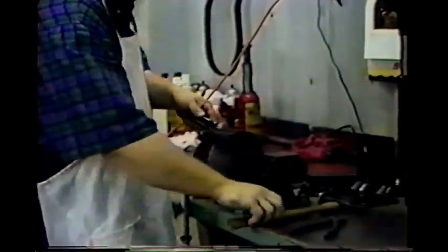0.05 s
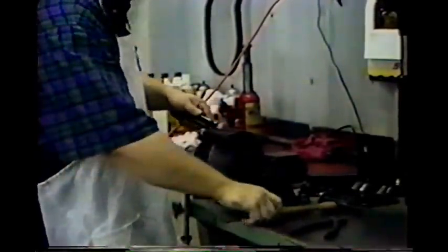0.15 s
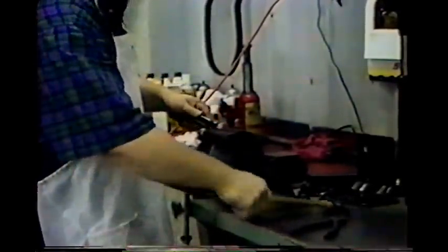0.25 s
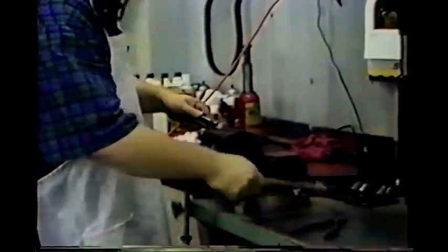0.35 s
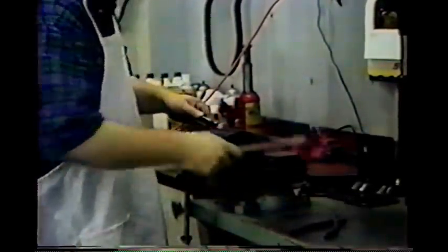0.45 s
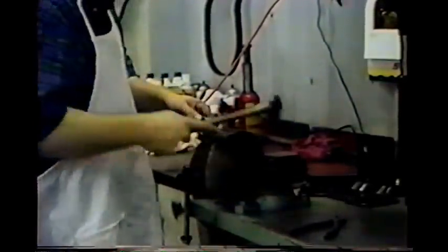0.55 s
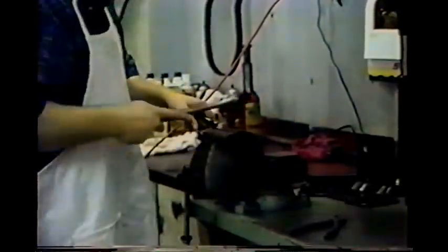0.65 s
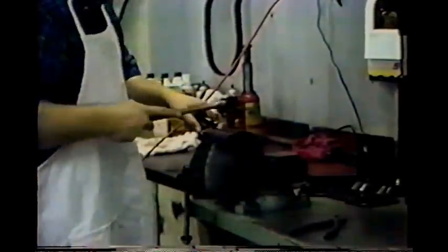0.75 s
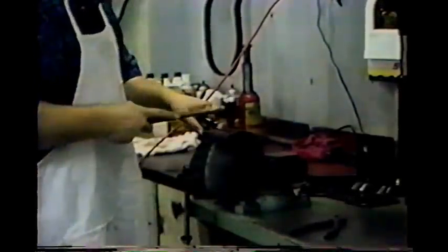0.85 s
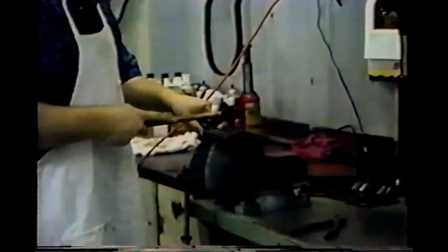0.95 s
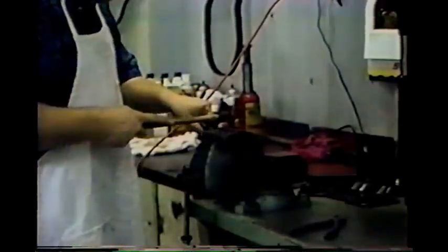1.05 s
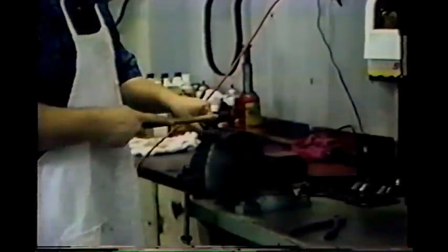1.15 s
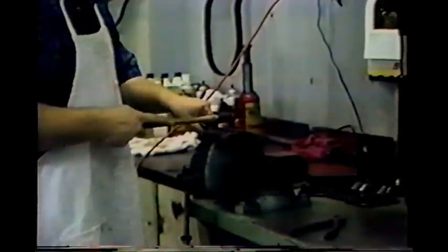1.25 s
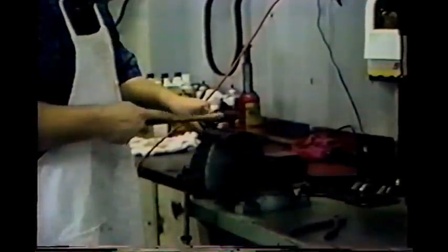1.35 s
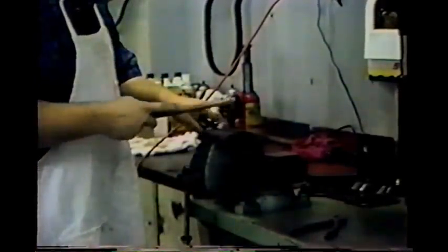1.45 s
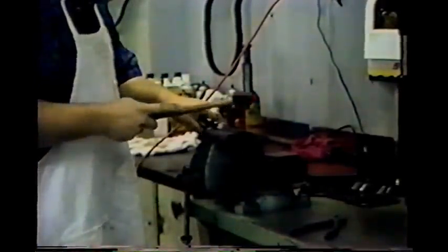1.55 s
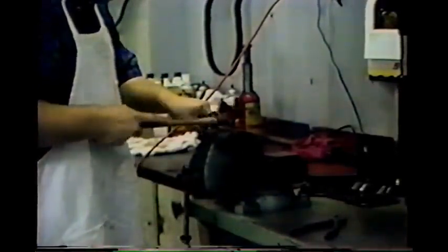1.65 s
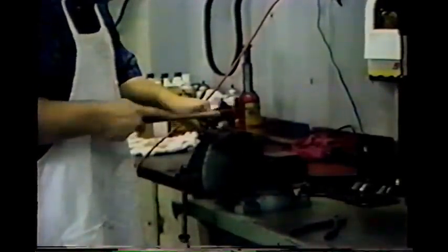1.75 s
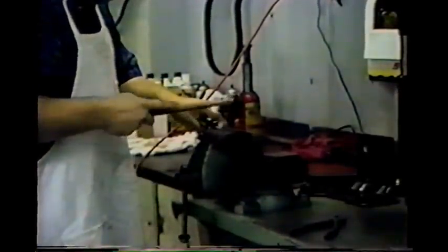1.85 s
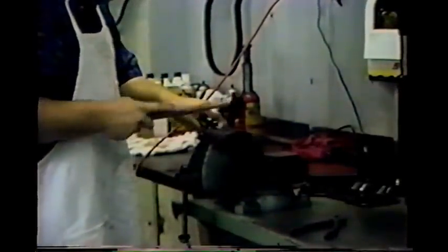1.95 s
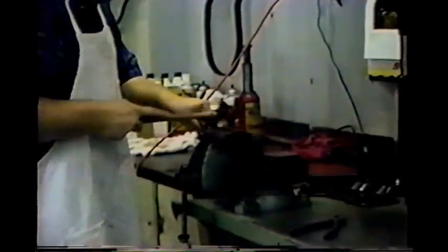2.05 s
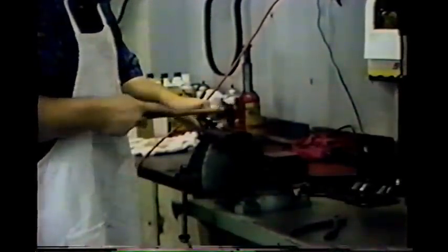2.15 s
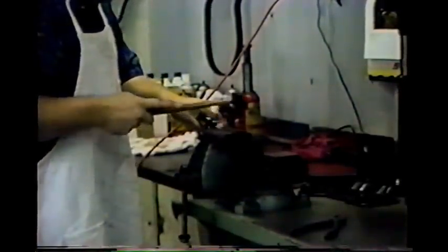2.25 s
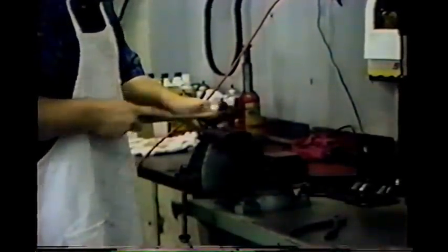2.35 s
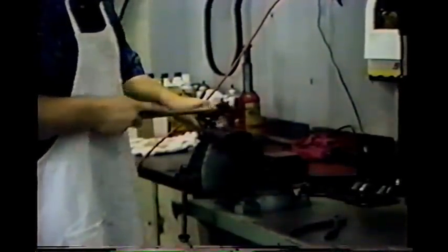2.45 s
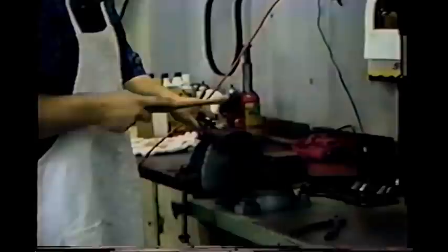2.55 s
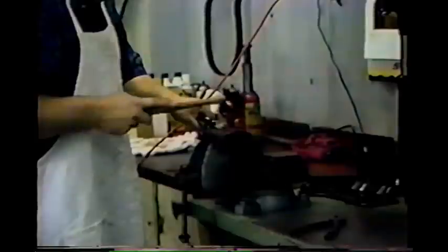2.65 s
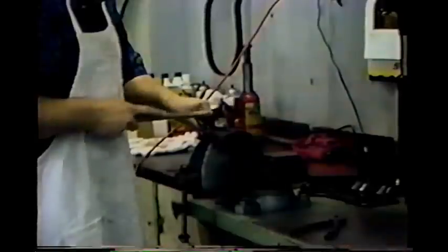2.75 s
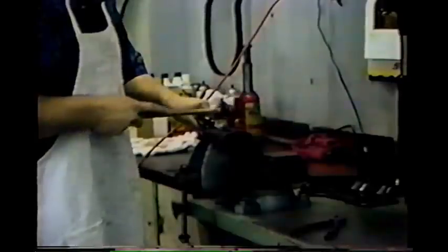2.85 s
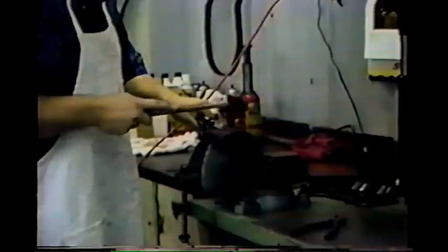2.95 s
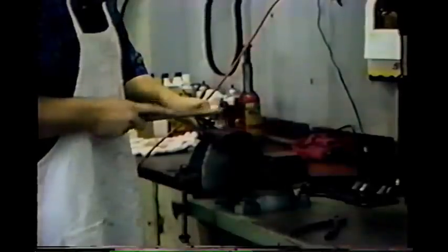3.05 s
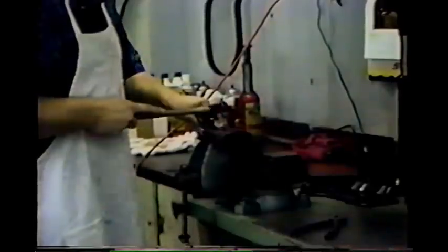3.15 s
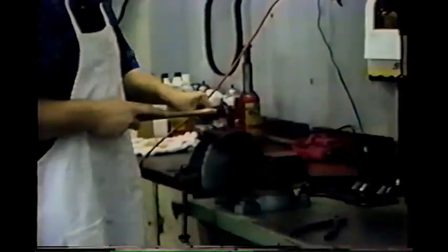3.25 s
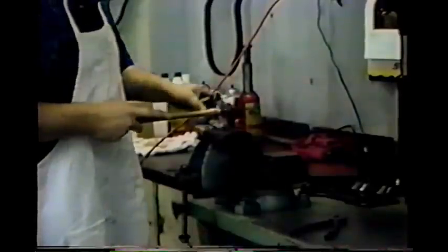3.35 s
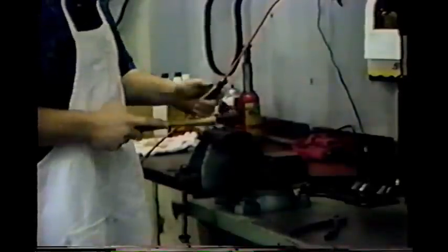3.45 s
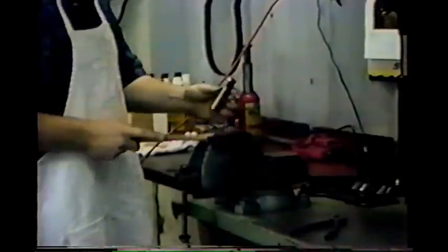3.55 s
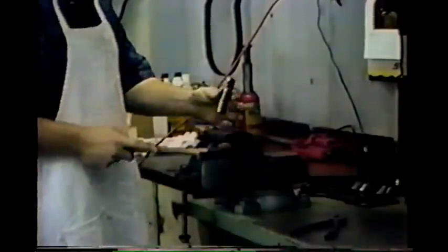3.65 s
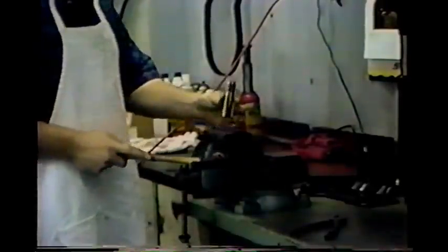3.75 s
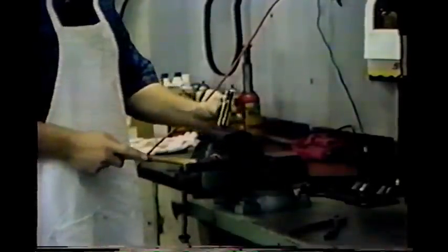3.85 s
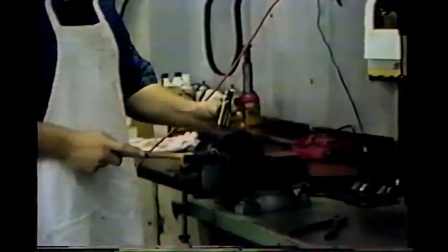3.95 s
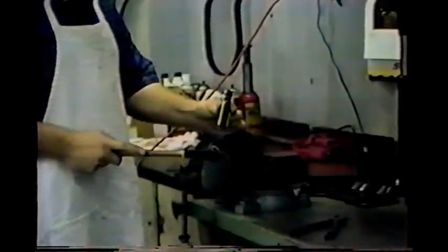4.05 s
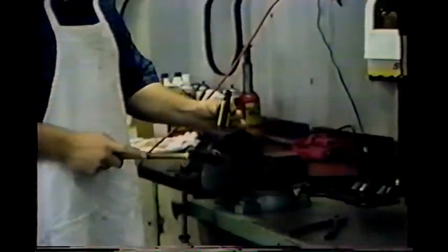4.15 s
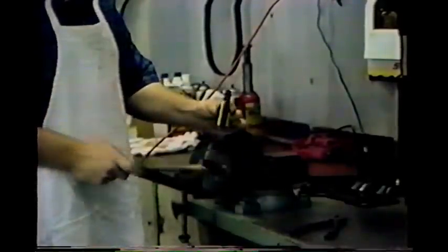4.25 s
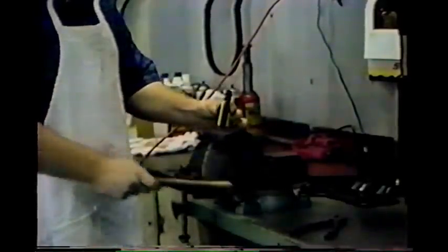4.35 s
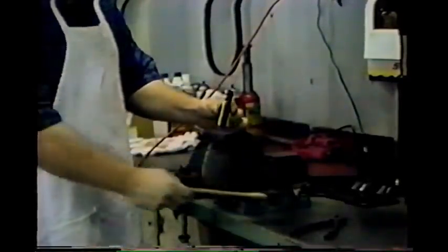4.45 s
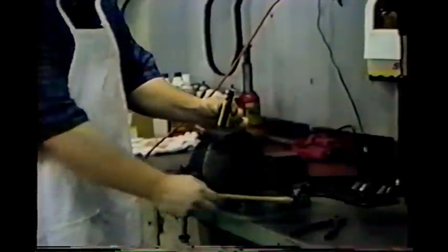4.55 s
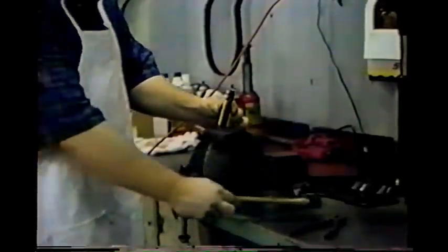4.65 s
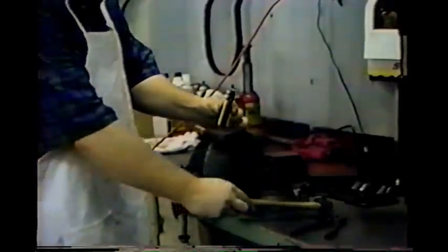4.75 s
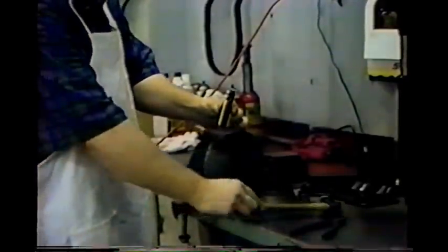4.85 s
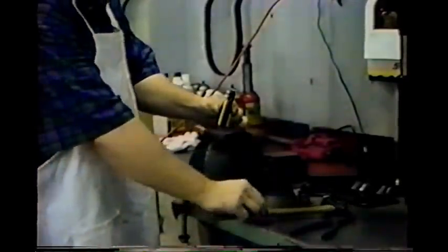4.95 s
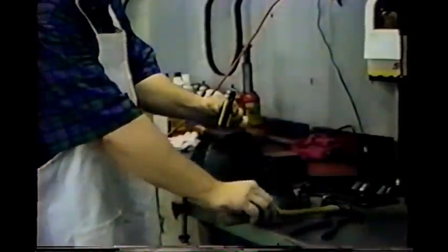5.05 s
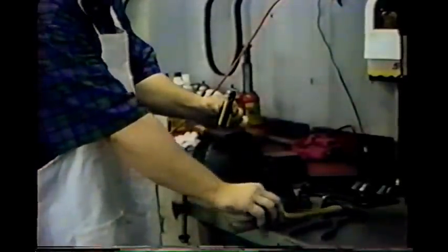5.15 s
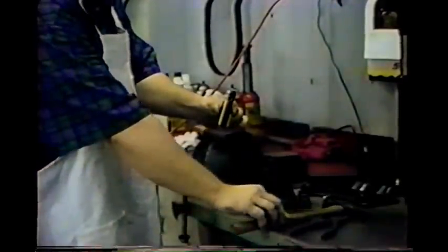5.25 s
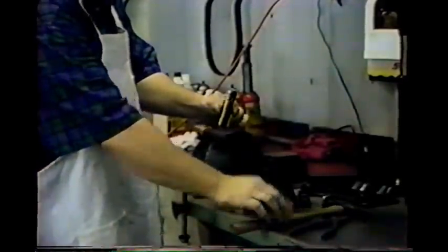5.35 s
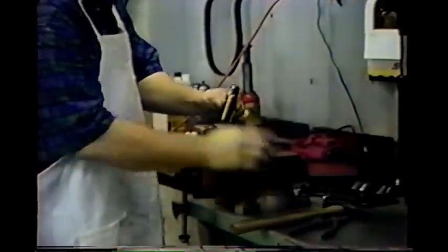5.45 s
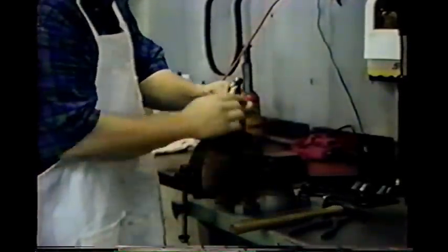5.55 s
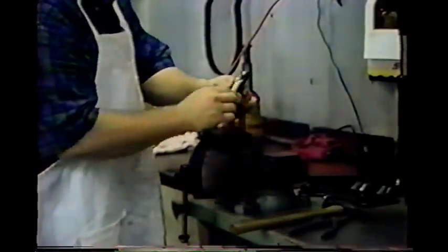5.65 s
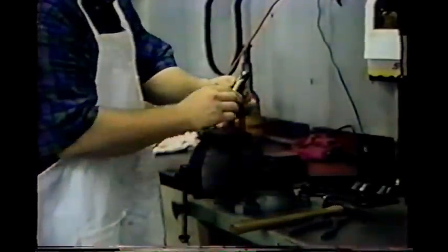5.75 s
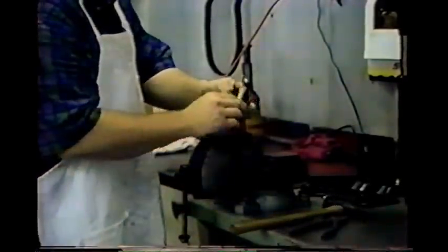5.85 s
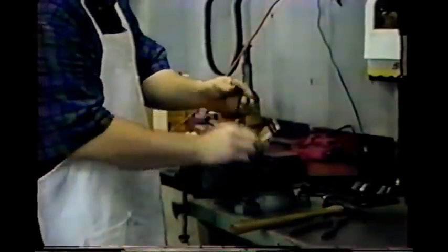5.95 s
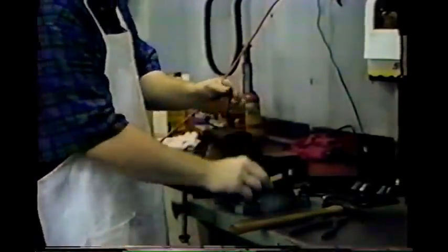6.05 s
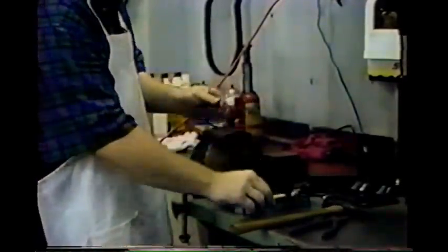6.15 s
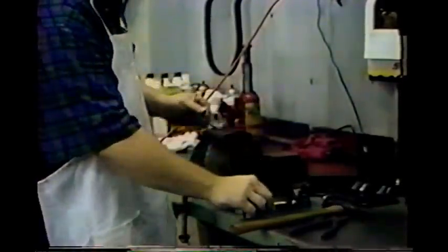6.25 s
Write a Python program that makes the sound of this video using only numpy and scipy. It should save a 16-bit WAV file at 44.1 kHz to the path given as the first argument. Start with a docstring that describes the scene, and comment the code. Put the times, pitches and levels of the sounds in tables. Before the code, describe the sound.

Short scrape, faint tap, five sharp hammer blows on steel clamped in a vise, a tiny clink, then a hammer rattling onto a bench.

```python
"""Hammer blows at a workbench

A hammer is dragged off a workbench, taps a screwdriver clamped in a vise, then strikes it five times.
Blows are shaped noise plus fading sines: the bench thuds, the steel rings and the workshop echoes.
A small part clinks, then the hammer clatters back onto the bench, over ventilation rumble, hiss and hum.
A tape camera hears it: loud sounds push its gain down, and from then on the gain only sinks further."""
import sys
import numpy as np
from scipy import signal
from scipy.fft import rfft, irfft
from scipy.io import wavfile
from scipy.ndimage import uniform_filter1d, minimum_filter1d

SR = 44100
rng = np.random.default_rng(int(sys.argv[2]) if len(sys.argv) > 2 else 0)


def unload_wav(signal):
    """Save mono or channel-first audio to the path in sys.argv[1] as 16-bit WAV at rate SR, clipped to [-1, 1]."""
    wavfile.write(
        sys.argv[1],
        SR,
        np.round(np.clip(np.atleast_2d(signal).T, -1, 1) * 32767).astype(np.int16),
    )


N = 278419  # length of the scene in samples
TAIL = 65536  # length of one struck sound or echo in samples


def amp(db):
    """Turns decibels into a gain."""
    return 10 ** (np.asarray(db) / 20)


def unit(x):
    """Scales a sound to an rms of 1."""
    return x / np.sqrt(np.mean(x ** 2) + 1e-20)


def read(points, hz):
    """Joins (frequency, value) points by straight lines on a log-frequency axis."""
    point_hz, value = np.transpose(points)
    return np.interp(np.log(hz + 1), np.log(point_hz + 1), value)


def bins(size):
    """Lists the frequencies in the spectrum of this many samples."""
    return np.fft.rfftfreq(size, 1 / SR)


def bell(hz, centre_hz, width_hz):
    """Draws the power curve of one resonance, with its top at 1."""
    return 1 / (1 + (2 * (hz - centre_hz) / width_hz) ** 2)


def noise(gain, size):
    """Makes random noise with the given gain at each frequency."""
    return irfft(rfft(rng.standard_normal(size)) * gain, size)


def bands(x, centres):
    """Splits a sound into overlapping frequency bands that add up to it again."""
    spectrum, hz = rfft(x), bins(len(x))
    return [irfft(spectrum * read(np.c_[centres, pick], hz), len(x)) for pick in np.eye(len(centres))]


def tone(hz, waver_hz, pace_hz, size):
    """Makes a sine of rms 1 whose pitch wavers at random."""
    drift = unit(noise(bell(bins(size), 0, pace_hz), size))
    cycles = np.cumsum(hz + waver_hz * drift) / SR
    return np.sqrt(2) * np.sin(2 * np.pi * (cycles + rng.random()))


def add(mix, start_s, sound):
    """Mixes a sound in at its start time."""
    part = mix[max(round(start_s * SR), 0):][:len(sound)]
    part += sound[:len(part)]


def hammering():
    """Each blow shakes vise and bench, with its own share of steel clank and steel ring."""
    # hammer on the screwdriver: (time [s], force [dB], bench thud [dB], treble [dB], length factor,
    # contact resonance [Hz], its width [Hz], its lift [dB], steel clank [dB], steel ring [dB])
    blows = [(0.9936, -43, 1, -1.5, 0.91, 990, 750, 15, -38.5, -64.5),
             (1.625, -20.5, -1.5, -4, 1.07, 1600, 900, 2, -14.5, -28),
             (1.9945, -24, -7.5, -11.5, 1.1, 1440, 400, 3, -25, -44),
             (2.3536, -26, 1.5, -3, 1.02, 920, 300, 6, -31, -43.5),
             (2.713, -25.5, 1, -0.5, 1.01, 1090, 400, 5, -38, -44),
             (3.0716, -27, -6.5, 0, 0.73, 1320, 900, 5, -37, -46)]
    # colour of vise and bench together: (frequency [Hz], relative level [dB])
    vise_colour = [(40, -5.5), (110, -6), (170, -1.5), (330, -0.5), (800, -2), (1500, -0.5), (2300, -0.5),
                   (3000, 1.5), (4100, -1), (5000, 0), (6200, -5.5), (7800, -10), (10000, -20.5),
                   (15500, -39.5)]
    # strongest low modes of the vise: (frequency [Hz], level [dB], time to fade by 60 dB [s])
    vise_modes = [(205, -23, 0.27), (338.7, -17, 0.29), (483, -16, 0.24), (718, -17.5, .22),
                  (881, -14.5, .22), (1140, -13, 0.33), (1332, -14.5, 0.21)]
    # close modes of the clamped steel: (frequency [Hz], relative level [dB], time to fade by 60 dB [s])
    steel_modes = [(3730, -11.5, 1.02), (4129, -8, .5), (4630, -6, 0.87), (4680, -13, 0.84),
                   (4880, -6.5, 1.6), (4847, -2, 0.85), (4955, -4.5, 0.94), (5030, -11.5, .9),
                   (4970, -1, 0.59), (5180, -10.5, 0.57)]
    steel_size = np.linalg.norm([amp(mode[1]) for mode in steel_modes])
    out = np.zeros(N)
    for start_s, force_db, *contact, clank_db, ring_db in blows:
        add(out, start_s, amp(force_db) * strike(vise_colour, vise_modes, *contact))
        add(out, start_s, amp(clank_db) * clank(centre_hz=4804, width_hz=650, t60=0.16))
        steel = ring(steel_modes, waver_hz=50, pace_hz=130)
        add(out, start_s, amp(ring_db) * steel / steel_size)
    return out


def strike(colour, modes, thud_db, treble_db, length, contact_hz, width_hz, lift_db):
    """A heavy body is hit: its treble cracks at once, its bass swells later, and a few modes ring clear."""
    # how the struck body swells and dies: (frequency [Hz], rise time constant [s], 60 dB fade time [s])
    thud_bands = [(80, .03, .4), (200, .028, .27), (450, 0.012, 0.27), (984, 0.0045, .26),
                  (2200, 0.002, 0.263), (4500, 0.00037, 0.25), (8000, 0.00035, .18), (14000, .0002, .12)]
    hz, t = bins(TAIL), np.arange(TAIL) / SR
    colour_db = read(colour, hz)
    colour_db += thud_db / (1 + (hz / 520) ** 2)  # acts mainly below 520 Hz
    colour_db += treble_db * hz ** 2 / (hz ** 2 + 3600 ** 2)  # acts mainly above 3600 Hz
    colour_db += lift_db * bell(hz, contact_hz, width_hz)  # the spot that is hit favours one region
    body = np.zeros(TAIL)
    parts = bands(noise(amp(colour_db), TAIL), [row[0] for row in thud_bands])
    for part, (_, rise_s, t60) in zip(parts, thud_bands):
        swell = 1 - np.exp(-t / rise_s)
        body += part * unit(swell * amp(-60 * t / (t60 * length)))
    body *= 1 + 0.47 * np.exp(-t / 0.0035)  # a short extra crack at the start
    clear = ring(modes, waver_hz=5.8, pace_hz=60) * (1 - np.exp(-t / 0.0047))
    first_50_ms = body[:SR // 20]
    return body / first_50_ms.std() + amp(thud_db / 2) * clear


def ring(modes, waver_hz, pace_hz):
    """Struck modes are fading sines; a quick waver smears close ones into one rough ring."""
    t = np.arange(TAIL) / SR
    return sum(amp(db - 60 * t / t60) * tone(hz, waver_hz, pace_hz, TAIL) for hz, db, t60 in modes)


def clank(centre_hz, width_hz, t60):
    """Steel meeting steel gives a short bright burst: noise around one pitch region, fading fast."""
    t = np.arange(TAIL) / SR
    return unit(noise(bell(bins(TAIL), centre_hz, width_hz), TAIL)) * amp(-60 * t / t60)


def clatter():
    """A loose steel part clinks as it is stood on the vise; then the hammer lands and settles on the bench."""
    # the hammer landing and settling: (time [s], force [dB], bench thud [dB], treble [dB], length factor,
    # contact resonance [Hz], its width [Hz], its lift [dB], head clank [dB])
    knocks = [(4.7357, -25, -2.5, -7, 0.74, 1690, 600, 1.5, -40),
              (4.7836, -31, 4, 4.5, 1, 4400, 1400, 4, -21),
              (4.866, -35.5, 2.5, -1.5, 0.77, 6460, 2000, 3, -34),
              (4.941, -24, -2.5, 0.5, 0.83, 2470, 696, 3.5, -45),
              (5.1665, -34, 1.5, -8, 0.62, 2100, 600, 5.5, -43)]
    # colour of the bare bench top: (frequency [Hz], relative level [dB])
    bench_colour = [(40, -2.5), (130, -8.5), (260, -6.5), (400, -3.5), (1200, 0.5), (2500, -3.5),
                    (4500, -3), (6500, -7), (9000, -21), (15500, -43)]
    # strongest low modes of the bench top: (frequency [Hz], level [dB], time to fade by 60 dB [s])
    bench_modes = [(336.6, -19.5, 0.27), (378, -15, 0.29), (569.6, -8.5, 0.21), (710, -16, 0.17),
                   (1076, -10.5, 0.29), (1333, -17, .2), (1770, -13, 0.18)]
    # modes of the loose steel part: (frequency [Hz], relative level [dB], time to fade by 60 dB [s])
    clink_modes = [(1400, -2, 0.14), (1728, 2, 0.24), (2250, -7, .15), (2660, -9, .15), (3128, -16, .18)]
    clink_s = 3.834
    out = np.zeros(N)
    touch = strike(bench_colour, bench_modes, thud_db=-12, treble_db=-10, length=0.61,
                   contact_hz=1650, width_hz=1100, lift_db=14.5)
    add(out, clink_s, amp(-50.5) * touch)
    add(out, clink_s, amp(-47.5) * ring(clink_modes, waver_hz=12, pace_hz=100))
    for start_s, force_db, *contact, clank_db in knocks:
        add(out, start_s, amp(force_db) * strike(bench_colour, bench_modes, *contact))
        add(out, start_s, amp(clank_db) * clank(centre_hz=4420, width_hz=1160, t60=0.13))
    return out


def drag():
    """Many tiny slips rattle the bench top while the hammer head squeals thinly at the start of each pull."""
    # pulls that slide the head off the bench: (start [s], length [s], final pressure [dB],
    # squeal [dB], squeal length [s])
    pulls = [(-.03, .128, -46.5, -51, .031), (.127, .097, -40.8, -50, .077)]
    # colour of the scrape: (frequency [Hz], relative level [dB])
    scrape_colour = [(59, -26), (100, -8), (293, -6), (592, 1), (1270, -1), (1350, 0.5), (2970, -9),
                     (4580, -9), (5520, -12.5), (6510, -19.5), (14000, -45)]
    # resonances of the squeal: (frequency [Hz], width [Hz], relative level [dB])
    squeal_peaks = [(5490, 420, 0), (7450, 280, -12.5)]
    slips_per_s, slip_t60 = 1100, 0.042  # average rate; seconds for one slip to fade by 60 dB
    swell_db_per_s = 50  # each pull presses harder towards its end
    t, hz = np.arange(N) / SR, bins(N)
    slips = rng.exponential(1, N) * (rng.random(N) < slips_per_s / SR)
    slip_power = amp(-60 * t[:TAIL] / slip_t60) ** 2
    shaking = np.sqrt(abs(signal.fftconvolve(slips, slip_power)[:N]))
    scrape = unit(shaking * noise(amp(read(scrape_colour, hz)), N))
    squeal_gain = sum(amp(db) * bell(hz, centre_hz, width_hz) for centre_hz, width_hz, db in squeal_peaks)
    squeal = unit(noise(squeal_gain, N))
    out = np.zeros(N)
    for start_s, length_s, pressure_db, squeal_db, squeal_s in pulls:
        remaining_s = np.clip(start_s + length_s - t, 0, length_s)
        pressure = amp(pressure_db - swell_db_per_s * remaining_s)
        out += scrape * pressure * stroke(t - start_s, length_s, release_t60=0.2)
        # the squeal breaks off once the head runs free
        out += squeal * amp(squeal_db) * stroke(t - start_s, squeal_s, release_t60=0.09)
    return out


def stroke(t, length_s, release_t60):
    """A rub that starts at t = 0 grips within 30 ms, holds and then lets go."""
    grip = np.clip(t / 0.03, 0, 1)
    return grip * amp(-60 * np.maximum(t - length_s, 0) / release_t60)


def workshop(x):
    """The room adds a diffuse echo: noise that builds up quickly and dies at its own pace in each band."""
    # echo of the workshop: (frequency [Hz], level [dB], time to fade by 60 dB [s])
    room = [(100, -10.5, .7), (350, -10.5, 1.02), (800, -17, 0.55), (1580, -12.5, 0.95),
            (2970, -10.5, 1.38), (4905, -14, 1.61), (8000, -9, 1.1), (14000, -2.5, 0.31)]
    t = np.arange(TAIL) / SR
    build_up = 1 - np.exp(-t / 0.0099)
    parts = bands(rng.standard_normal(TAIL) / np.sqrt(TAIL), [row[0] for row in room])
    echo = np.zeros(TAIL)
    for part, (_, db, t60) in zip(parts, room):
        echo += part * amp(db) * unit(build_up * amp(-60 * t / t60))
    return x + signal.fftconvolve(x, echo)[:N]


def ports(x):
    """Reflections from the sides reach the two microphone ports a little differently."""
    # what differs between the ports: (frequency [Hz], side level against the middle [dB])
    width = [(30, -7), (125, -9), (250, -13), (500, -18), (1000, -22), (4000, -22), (8000, -19),
             (15000, -21)]
    fade = unit(amp(-60 * np.arange(TAIL) / SR / 0.19))  # fades by 60 dB in 0.19 s
    scatter = noise(amp(read(width, bins(TAIL))), TAIL) * fade / np.sqrt(TAIL)
    side = signal.fftconvolve(x, scatter)[:N]
    return np.array([x + side, x - side])


def steady(colour):
    """Air flow and hiss are steady noise with a given level in each hertz of bandwidth."""
    return noise(amp(read(colour, bins(N))) * np.sqrt(SR / 2), N)


def scene():
    """The work at the bench and its echo sound over the ventilation rumble, heard at two ports."""
    # colour of the ventilation: (frequency [Hz], relative level [dB])
    air_colour = [(12, -43.5), (20, -13.5), (43, -10.5), (70, 2.5), (135, -2), (169, -1.5), (238, -4),
                  (450, -13), (682, -16.5), (938, -16.5), (2210, -20.5), (2380, -23.5), (4850, -30.5),
                  (7000, -33), (9100, -67), (15400, -120)]
    work = workshop(hammering() + clatter() + drag())
    return ports(work + amp(-57.5) * unit(steady(air_colour)))


def gain_control(x):
    """Loudness above a limit turns the gain down; it never recovers and sinks slowly after each new low."""
    limit_db, attack_s = -25.5, 0.012
    sink_db_per_s = 0.28
    keep = np.exp(-1 / (attack_s * SR))
    power = signal.lfilter([1 - keep], [1, -keep], (x ** 2).mean(0))
    power_db = 10 * np.log10(power + 1e-12)
    sink_db = sink_db_per_s * np.arange(N) / SR
    held_peak_db = np.maximum.accumulate(power_db - sink_db) + sink_db
    return x * amp(-np.maximum(held_peak_db - limit_db, 0))


def limiter(x):
    """Peaks above a ceiling are flattened by a fast gain that follows the louder channel."""
    peak = -minimum_filter1d(-abs(x).max(0), size=120)
    crest = uniform_filter1d(peak, size=120)
    return x / np.maximum(crest / amp(-20.5), 1)  # ceiling -20.5 dB


def record(dry):
    """The camera controls the gain, limits peaks, adds hiss and hum, tilts the stereo and cuts the top."""
    # tape hiss: (frequency [Hz], level in each hertz [dB])
    hiss_colour = [(20, -104), (70, -102), (200, -107), (500, -112), (1500, -117), (4000, -119),
                   (10000, -119), (14700, -119), (15400, -112), (15750, -105), (16000, -112)]
    # hum and whine of the camera: (frequency [Hz], level [dB], pitch waver [Hz])
    hum_tones = [(30, -77, 1.2), (74.6, -81.5, 2), (122, -81.5, 2.12), (176, -83, 2.5), (364, -82.5, 1.2),
                 (539, -84.5, 0.84), (670, -84.5, 1), (7980, -83.5, 3), (15735, -73, 24)]
    # lean between the channels: (frequency [Hz], left minus right [dB])
    lean_points = [(30, 7), (60, -0.5), (250, 0.2), (1000, 1.7), (3000, 2), (10000, 2.3)]
    held = limiter(gain_control(dry))
    hum = sum(amp(db) * tone(hz, waver_hz, pace_hz=40, size=N) for hz, db, waver_hz in hum_tones)
    noisy = held + ports(steady(hiss_colour) + hum)
    lean = amp(np.outer([0.5, -0.5], read(lean_points, bins(N))))
    leaning = irfft(rfft(noisy) * lean, N)
    low_pass = signal.firwin(511, 16000, window=("kaiser", 9), fs=SR)  # nothing much above 16 kHz
    return signal.oaconvolve(leaning, low_pass[None], "same")


dry = scene()
out = record(dry)
unload_wav(out)
```